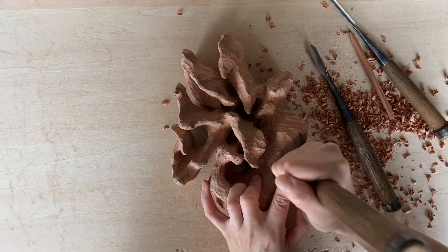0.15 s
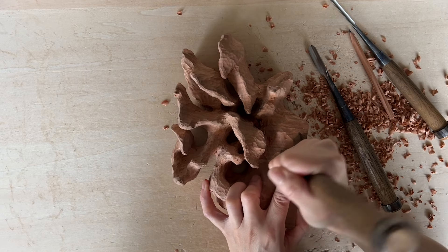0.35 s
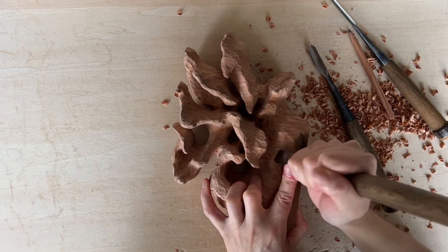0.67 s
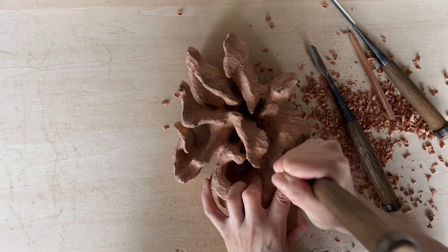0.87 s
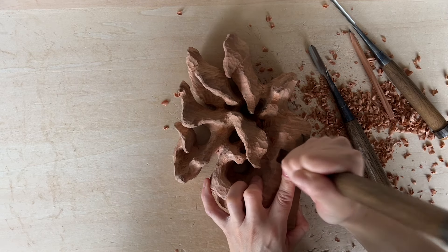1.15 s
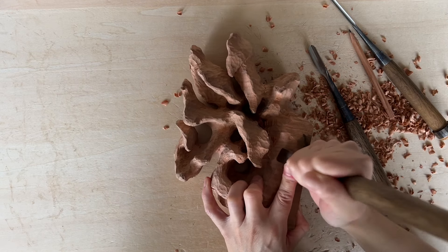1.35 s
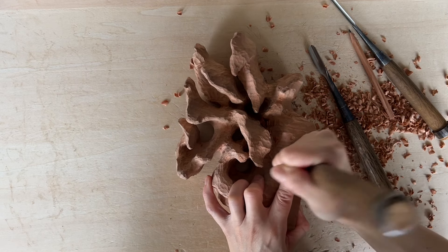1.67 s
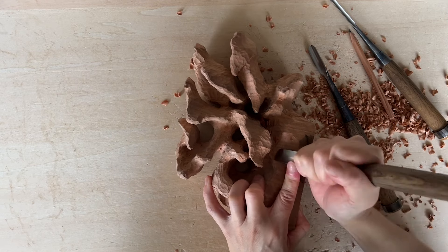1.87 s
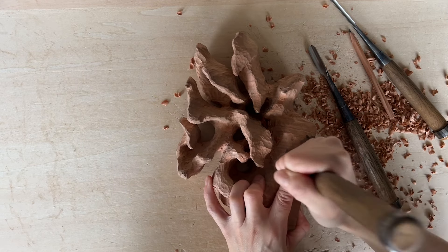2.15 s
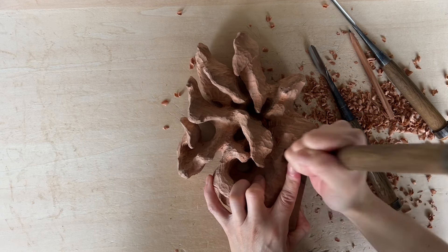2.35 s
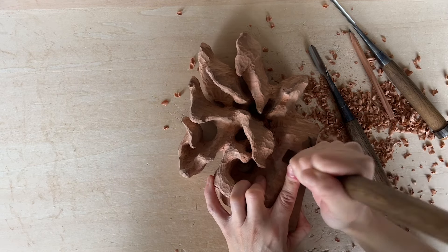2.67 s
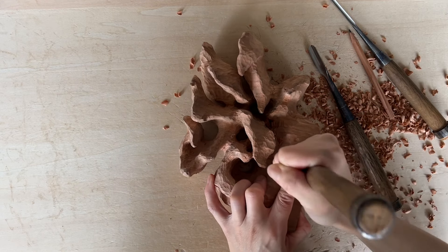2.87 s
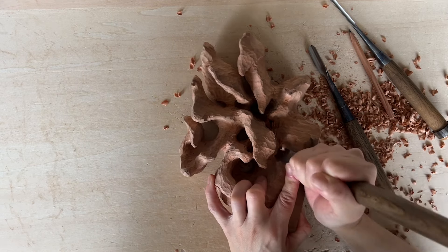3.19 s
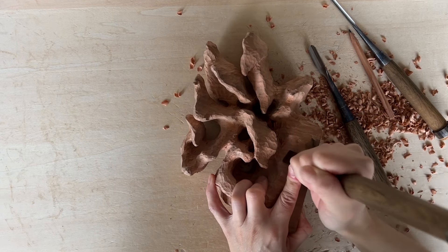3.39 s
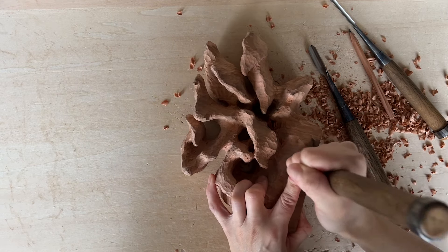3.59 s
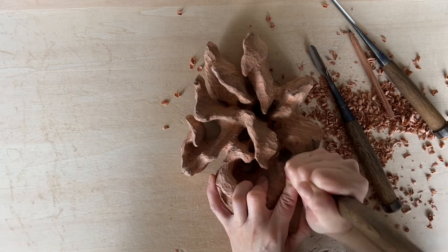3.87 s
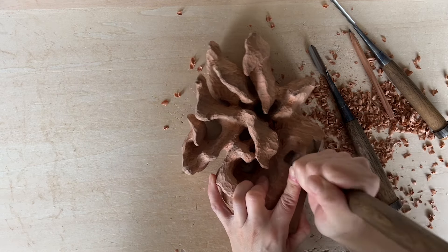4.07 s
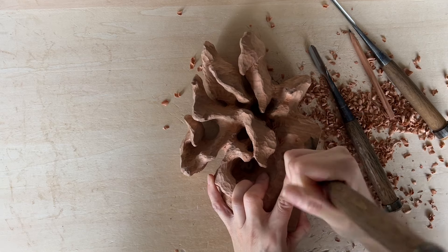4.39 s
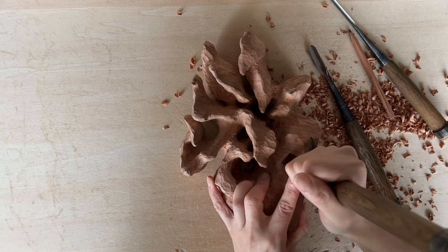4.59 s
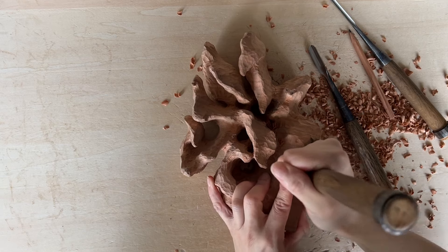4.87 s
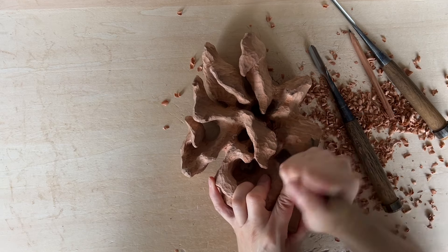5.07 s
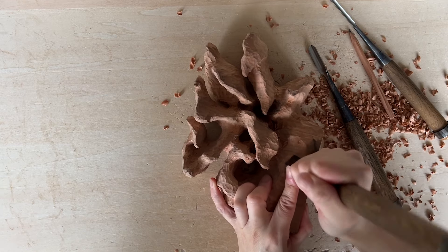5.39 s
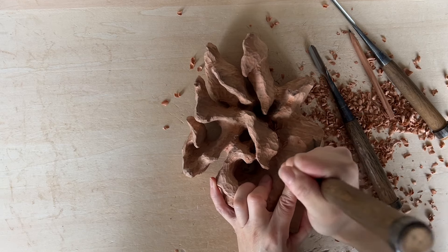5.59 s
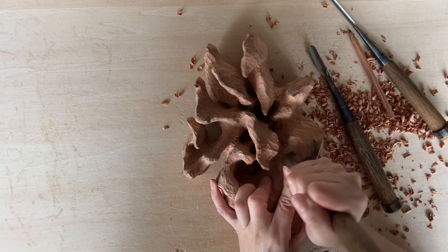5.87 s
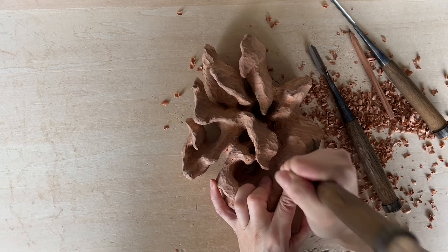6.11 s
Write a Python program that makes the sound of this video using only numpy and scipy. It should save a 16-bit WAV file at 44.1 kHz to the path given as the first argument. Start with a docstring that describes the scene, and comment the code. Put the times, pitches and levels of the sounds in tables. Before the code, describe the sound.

Close wood carving: brief dry scrapes end in sharp cracks and dull knocks, growing harder, with light chip taps between over low room air.

```python
"""A faint hum and low room air in a quiet workshop are heard first; then a hand gouge cuts a hardwood carving.
In each stroke the edge scrapes by stick-slip friction; fibres tear in quick runs and snap with sharp jolts.
The carving rocks back on the wooden bench with decaying modes, chips land, and the drawn-back gouge rubs lightly.
Bending waves are dispersive: the bench brings the treble of a jolt first, so it is heard as a short falling chirp."""
import sys
import numpy as np
from scipy import signal
from scipy.fft import rfft, irfft, next_fast_len
from scipy.io import wavfile

SR = 44100
rng = np.random.default_rng(int(sys.argv[2]) if len(sys.argv) > 2 else 0)


def transcribe(signal):
    """Save signal, clipped to [-1, 1], as a 16-bit WAV file at the path in sys.argv[1]."""
    frames = np.atleast_2d(signal).T
    limited = np.clip(frames, -1, 1)
    pcm = np.round(limited * 32767).astype(np.int16)
    wavfile.write(sys.argv[1], SR, pcm)


N = 275184
TIME = np.arange(N) / SR  # seconds

# Levels in the tables are relative: later gains, resonances and echoes act on them.
# Pushes of the gouge. Each row: time the edge is fully in (s), end (s), time to ease in (s), bite (dB),
# change of bite as the chip lifts (dB).
STROKES = [(0.353, 0.542, 0.056, -63, 5.5), (0.982, 1.213, 0.022, -62.5, 3),
           (1.628, 1.857, 0.084, -59.5, 2), (2.257, 2.474, 0.013, -59.5, 4),
           (2.911, 2.924, 0.099, -59.5, 7), (2.927, 3.117, .02, -64, 14), (3.721, 3.873, 0.034, -53.5, 4),
           (4.963, 5.106, 0.018, -58.5, 10), (5.713, 5.78, 0.19, -55, -0.5), (6.185, 6.4, 0.02, -60, 4)]
ENTRY_DB, RELEASE_S = 29.5, 0.0099  # rise of the bite over the easing time; time over which it is let go
LIFT_S, LEAN_S = 0.066, 0.036  # the chip starts to lift this long before the end; the hand leans in over this time
# Small fibres that catch along the way: rate, mean level over the bite and its standard deviation.
CATCHES_PER_S, CATCH_DB, CATCH_SPREAD_DB = 22, 14, 5.5
# Runs of fibres tearing. Each row: middle (s), level (dB), half-width (s), crackle relative to that level (dB).
TEARS = [(0.539, -31.5, 0.015, -18), (1.193, -31, 0.021, -12), (1.747, -35, 0.011, -18),
         (1.827, -37, 0.027, -32), (2.399, -37, 0.041, -10.5), (2.919, -48, 0.011, 2),
         (3.096, -27.5, 0.01, -7.5), (3.118, -31, 0.0026, 0), (3.791, -37, 0.05, -16),
         (3.825, -18.5, 0.014, -13.5), (3.858, -31.5, 0.024, -16), (5.078, -22.5, 0.015, -14),
         (5.712, -27, 0.0086, -3), (5.756, -23.5, 0.005, -10.5), (5.774, -19, 0.0025, -20)]
# Fibres snapping. Each row: time (s), peak of the jolt (dB), brightness (dB per octave).
SNAPS = [(0.471, -31, 6.5), (0.5066, -33, 0.5), (0.5283, -29, 4), (0.988, -39, 0), (1.173, -26.5, 2),
         (1.6745, -31, 2.5), (1.7236, -24.5, 1.5), (1.8, -17.5, 4), (2.261, -38, -1), (2.426, -22.5, -3),
         (2.473, -27.5, 4), (3.0692, -33.5, 2), (3.116, -6.5, -0.5), (3.8165, -16.5, 4), (3.8679, -5, 3),
         (5.032, -30, -3), (5.052, -21, 1), (5.0752, -24.5, 6), (5.0984, -5.5, 2.5), (5.7141, -20, -2.5),
         (5.7747, -13.5, 2)]
# The carving dropping back on the bench. Each row: time (s), level (dB).
ROCKS = [(0.532, -45), (1.114, -49.5), (1.804, -38), (2.478, -36), (2.922, -43), (3.12, -33.5),
         (3.872, -28), (5.103, -31), (5.721, -28.5), (5.779, -30)]
# Chips landing. Each row: time (s), peak of the jolt (dB), brightness (dB per octave),
# ring of the spot they hit relative to that peak (dB).
CHIPS = [(0.739, -39.5, -1, -26), (2.029, -44, -4.5, -32), (2.6609, -47.5, -2.5, -27),
         (2.802, -50.5, -2.5, -31), (3.199, -45.5, 8.5, -37), (4.149, -28, 1, -10.5),
         (4.592, -33.5, -2, -20.5), (5.380, -19, -0.5, -35.5), (5.943, -33, 3.5, -11)]
# The gouge drawn back after a cut. Each row: middle (s), level (dB), half-width (s).
BRUSHES = [(0.667, -73, 0.15), (1.32, -66.5, 0.064), (1.959, -66, 0.06), (2.575, -67.5, 0.075),
           (3.252, -63, 0.09), (4.059, -60, 0.037), (4.501, -75, 0.025), (5.275, -60, 0.016),
           (5.837, -64.5, 0.061)]
SET_DOWN_S, SET_DOWN_DB = 0.13, -12.5  # the gouge is set down again this much later, at this relative level

# Spectra of the sources, in order: fine scrape, coarse scrape, tearing fibres, splinters, snapping fibres,
# landing chips, rattling chips, light rubbing. Each row: frequency (Hz), relative spectral level (dB).
HISS_SPECTRUM = [(150, -25), (500, -2.5), (800, 15.5), (1100, 5.5), (1800, 5.5), (2500, 6.5), (3400, -12.5),
                 (4600, -14.5), (6000, -8.5), (7500, -7.5), (8500, -8.5), (10500, -13), (12500, -12),
                 (15500, -17.5)]
JUDDER_SPECTRUM = [(40, -26.5), (120, -2), (300, 2), (560, 0.5), (780, -3.5), (1100, -17.5), (2400, -14.5),
                   (3500, -27), (12000, -37)]
TEAR_SPECTRUM = [(40, -31.5), (120, 0.5), (300, 6), (600, 0.5), (1050, -14), (1500, -25.5), (3500, -44.5),
                 (16000, -56.5)]
CRACKLE_SPECTRUM = [(200, -24), (700, 16), (1100, -5.5), (1600, -1.5), (2500, 6.5), (3500, -14),
                    (7500, -18), (11000, -13.5), (16000, -41)]
SNAP_SPECTRUM = [(30, -29), (90, -16), (200, 7.5), (350, 3.5), (560, -2), (750, -9.5), (1050, -26),
                 (1600, -24), (2500, -37.5), (3600, -50.5), (8000, -68.5), (16000, -74.5)]
CHIP_SPECTRUM = [(50, -10), (170, 2), (350, 8.5), (540, 3), (750, -8.5), (1200, -9), (1700, -15),
                 (2400, -13), (4200, -26.5), (8000, -48), (15000, -73)]
CLATTER_SPECTRUM = [(300, -11), (900, -14), (1400, 9), (1800, 18.5), (3000, -9), (4200, -3), (5400, -28),
                    (7500, -7), (9000, -25), (15000, -41)]
BRUSH_SPECTRUM = [(200, -14.5), (800, 11), (1600, 10.5), (2000, -1.5), (2450, 15), (3200, -2.5),
                  (3900, 5.5), (5500, -5.5), (7000, 3), (8700, -13), (11000, 4), (13000, -20), (15500, -27)]

# Resonances of the gouge pressed into the carving, then of the bench top.
# Each row: centre (Hz), width (Hz), lift by this resonance alone (dB, negative for a dip).
GOUGE_RESONANCES = [(1234, 7.1, 5.5), (1388, 39, 10), (1526, 24, 5.5), (2290, 45, 7), (2423, 20, -13.5),
                    (2805, 23, 10.5), (3790, 26, 12.5), (4370, 130, 13), (4730, 70, 11.5), (4980, 100, 5.5),
                    (5460, 26, 13.5), (5390, 10, 12.5), (6590, 49, 13), (7140, 44, 7.5), (7780, 110, 6),
                    (10215, 110, 13.5), (11200, 50, 13.5)]
BENCH_RESONANCES = [(89, 8.4, 7.5), (234, 7.3, 5), (351, 36, 2.5), (565.6, 99, 2), (616, 12, -1.5),
                    (791, 14, 5), (921.4, 20, 5.5), (1050, 16, 6.5), (1196, 12, 9.5), (1561, 16, 7.5),
                    (2690, 14, 6)]
# Modes of the carving rocking on the bench, then modes rung by a landing chip.
# Each row: frequency (Hz), relative level (dB), time to fall by 60 dB (s).
ROCKING_MODES = [(62.5, -3, 0.35), (87.3, 1.5, 0.076), (112.8, -1.5, 0.16), (145, -15.5, 0.12)]
CHIP_MODES = [(1200, -11.5, 0.13), (1438, -23, 0.049), (1574, -3.5, 0.09), (1619, 5, 0.087),
              (1750, -3, 0.039), (1820, -39, 0.018), (2440, -25, 0.036), (3040, -7, 0.02),
              (4010, -12, 0.034), (6885, -19, .05)]

# Decay of the room, then of the near echoes. Each row: frequency (Hz), time to fall by 60 dB (s).
ROOM_DECAY = [(60, 1), (250, 0.31), (600, 0.45), (1600, 0.43), (4000, 0.45), (8000, 0.55), (16000, 0.093)]
NEAR_DECAY = [(100, 0.35), (1000, 0.022), (8000, 0.062)]
# Stereo difference in the echoes, then in the room air. Each row: frequency (Hz), gain (dB).
ECHO_SIDE = [(100, -20.5), (500, 0.5), (1500, 0.5), (5000, -1.0)]
AIR_SIDE = [(60, -16.5), (300, -6.0), (1500, 1), (8000, -6)]
# Phase between the microphone ports. Each row: frequency (Hz), lead of the left port (radians).
PORT_PHASE = [(0, 0), (2330, -0.0), (2580, -0.6), (3190, -0.4), (4740, -1.0), (5430, -0.2), (6460, -0.3),
              (7580, 0.4), (8180, 1.0), (9040, 3.1), (9650, 3.1), (11100, 5.6), (12700, 6.7), (13800, 9.4),
              (14900, 9.4), (15500, 10.7)]
# Lean of the close sound to the left. Each row: frequency (Hz), relative lean (scaled to dB in use).
PORT_LEAN = [(100, 2.0), (500, 5.0), (2500, 3.1), (4500, -7.0), (9000, -1.1)]
# Room air. Each row: frequency (Hz), relative spectral level (dB).
AIR_SPECTRUM = [(20, -16), (40, -5.5), (62, -3.5), (95, -12.5), (190, -11), (300, -15.5), (670, -25),
                (1100, -30), (2300, -42.5), (3000, -50.5), (10000, -61.5), (15000, -69.5)]
AIR_DB, AIR_FADE_DB_PER_S = -57.5, 0.42  # rms level at the start, and its fall
# Hum components. Each row: frequency (Hz), relative level (dB), fade (dB per s, negative for a rise).
HUM = [(59.2, -58.5, 3), (186, -67.5, -1), (227, -73.5, 0.2)]


def scraping(hiss_db=4.0, judder_db=10, grain_db=1.5, grain_hz=70):
    """Stick-slip friction: a fine hiss and a coarser judder follow the bite, both catching on the grain."""
    fine = slips(1500, 1.9, HISS_SPECTRUM, 0.003044)
    coarse = slips(350, 2.1, JUDDER_SPECTRUM, 0.0038)
    force = bite()
    out = amp(judder_db) * force * coarse
    stroke_ends = [row[1] + RELEASE_S for row in STROKES]
    stroke = np.searchsorted(stroke_ends, TIME)
    for k in np.unique(stroke):
        now = stroke == k
        hiss = signal.fftconvolve(force[now] * fine[now], spot())
        add(out, TIME[now][0], amp(hiss_db) * hiss)
    return out * amp(grain_db * drift(grain_hz))


def bite():
    """Cutting force: the edge eases in, pushes evenly, changes its bite as the chip lifts, and lets go."""
    out = np.zeros(N)
    for start, end, ease_s, db, lift_db in STROKES:
        entry_db = ENTRY_DB * np.minimum(TIME - start, 0) / ease_s
        lifting = np.clip((TIME - end + LIFT_S) / LEAN_S, 0, 1)
        release = np.clip(1 - (TIME - end) / RELEASE_S, 0, 1)
        out = np.maximum(out, release * amp(db + entry_db + lift_db * lifting))
    return out


def spot(ring_s=0.0026, ring_db=-7):
    """Local impulse response: a short random ring where the edge sits colours each stroke differently."""
    t = np.arange(SR // 30) / SR
    ring = rng.standard_normal(len(t)) * np.exp(-t / ring_s)
    response = (t == 0) + amp(ring_db) * ring / np.linalg.norm(ring)
    return response / np.linalg.norm(response)


def catching(tilt_db=3):
    """Random brittle fracture: small fibres snap while the edge is in the wood, louder under a harder bite."""
    caught = rng.random(N) < CATCHES_PER_S / SR
    clicks = caught * amp(CATCH_DB + CATCH_SPREAD_DB * rng.standard_normal(N))
    return signal.oaconvolve(clicks * bite(), chirp(SNAP_SPECTRUM, 0.00381, tilt_db))[:N]


def tearing(tear_db=-1, crackle_db=-2):
    """Progressive fracture: fibres give way in a quick run of dull slips, with splinters crackling on top."""
    dull = swells([(s, db + tear_db, length) for s, db, length, sharp_db in TEARS])
    sharp = swells([(s, db + sharp_db + crackle_db, length) for s, db, length, sharp_db in TEARS])
    fibres = dull * slips(1300, 0.93, TEAR_SPECTRUM, 0.003836)
    splinters = sharp * slips(1800, 1.3, CRACKLE_SPECTRUM, 0.003)
    return fibres + splinters


def snapping():
    """Impulsive release: breaking fibres send out jolts, and the carving drops back to ring the rocking modes."""
    out = np.zeros(N)
    for s, db, tilt_db in SNAPS:
        add(out, s, amp(db) * chirp(SNAP_SPECTRUM, 0.0039, tilt_db))
    for s, db in ROCKS:
        add(out, s, amp(db) * ringing(ROCKING_MODES))
    return out


def landing(lag=0.003824, bounce_s=0.0069, bounce_db=-9, clatter_db=-14, clatter_s=0.0035):
    """Impact and reflection: a chip excites a chirp and modes; the far bench edge returns a duller chirp."""
    out, rocking = np.zeros((2, N))
    t = np.arange(SR // 10) / SR
    for s, db, tilt_db, ring_db in CHIPS:
        add(out, s, amp(db) * chirp(CHIP_SPECTRUM, lag, tilt_db))
        add(out, s + bounce_s, amp(db + bounce_db) * chirp(CHIP_SPECTRUM, lag, tilt_db - 2))
        add(out, s, amp(db + ring_db) * ringing(CHIP_MODES))
        # the curled chip rattles to rest, more strongly after a brighter impact
        add(rocking, s, amp(db + clatter_db + 2 * tilt_db) * np.exp(-t / clatter_s))
    return out + rocking * slips(2400, 0.72, CLATTER_SPECTRUM, 0.00197)


def brushing(brush_db=2):
    """Light sliding friction: the gouge rubs as it is drawn back and set down again."""
    set_down = [(s + SET_DOWN_S, db + SET_DOWN_DB, length) for s, db, length in BRUSHES]
    motion = swells(BRUSHES) + swells(set_down)
    return amp(brush_db) * motion * slips(1100, 1.84, BRUSH_SPECTRUM, 0.0011)


def slips(per_s, spread_db, spectrum, lag):
    """Stick-slip as shot noise: a steady random stream of tiny jolts of uneven size and sign, rms 1."""
    size = amp(spread_db * np.minimum(rng.exponential(1, N), 3)) * rng.choice([-1, 1], N)
    clicks = size * (rng.random(N) < per_s / SR)
    return unit(signal.oaconvolve(clicks, chirp(spectrum, lag))[:N])


def chirp(spectrum, lag, tilt_db=0, size=4096):
    """Bending-wave dispersion: delay goes nearly as lag (s at about 1 kHz) / sqrt(frequency in kHz); peak 1."""
    hz = np.fft.rfftfreq(size, 1 / SR)
    delay = lag * np.sqrt(1000 / (hz + 20))
    # phase is the running sum of delay, counted from that of the highest frequency
    phase = 2 * np.pi * np.cumsum(delay - delay[-1]) * SR / size
    brightness_db = tilt_db * np.log2(np.clip(hz, 200, 6000))
    gain = amp(read(spectrum, hz) + brightness_db) * (hz > 0)
    wave = irfft(gain * np.exp(-1j * phase))[:size // 2]
    return wave / abs(wave).max()


def ringing(modes):
    """Modal superposition: a sum of exponentially dying sines."""
    t = np.arange(SR // 2) / SR
    return sum(amp(db - 60 * t / t60) * np.sin(2 * np.pi * hz * t) for hz, db, t60 in modes)


def resonate(x, modes):
    """Resonant response: a body lifts or dips the sound around each of its resonances."""
    size = next_fast_len(N + SR, True)
    hz = np.fft.rfftfreq(size, 1 / SR)
    lift = 1 + sum((amp(db) - 1) / (1 + 2j * (hz - centre) / width) for centre, width, db in modes)
    return irfft(rfft(x, size) * lift, size)[:N]


def ports(x, lean_scale=0.2247):
    """Interchannel phase: the close sound reaches two ports with a gap that is largest in the high treble."""
    hz = np.fft.rfftfreq(N, 1 / SR)
    lean_db = lean_scale * read(PORT_LEAN, hz)
    gap = np.exp(-1j * read(PORT_PHASE, hz))
    return irfft(rfft(x) * np.array([amp(lean_db), amp(-lean_db) * gap]), N)


def reflections(x, t60s, start):
    """Diffuse decay: sparse random-sign echoes after start (s) die at a speed set by frequency."""
    t = np.arange(SR) / SR
    taps = rng.choice([-1., 1.], (2, SR)) * (rng.random((2, SR)) < 1 / 10) * (t > start)
    hz, t, (mid, side) = signal.stft(taps, SR, nperseg=256)
    side = side * amp(read(ECHO_SIDE, hz))[:, None]  # the bass is nearly alike in both channels
    decay = amp(-60 * t / read(t60s, hz)[:, None])
    tail = signal.istft(np.array([mid + side, mid - side]) * decay, SR, nperseg=256)[1]
    return signal.fftconvolve(x[None], tail / np.linalg.norm(tail[0]), axes=1)[:, :N]


def workshop(hum_db=-1, waver=0.36):
    """Stationary background: filtered noise for slowly fading room air, and wavering sines for the hum."""
    hz = np.fft.rfftfreq(N, 1 / SR)
    mid, side = rfft(rng.standard_normal((2, N))) * amp(read(AIR_SPECTRUM, hz))
    side = side * amp(read(AIR_SIDE, hz))
    noise = unit(irfft(np.array([mid + side, mid - side]), N))
    out = amp(AIR_DB - AIR_FADE_DB_PER_S * TIME) * noise
    for line_hz, db, fade in HUM:
        tone = np.sin(2 * np.pi * (line_hz * TIME + rng.random()))
        out = out + amp(db + hum_db - fade * TIME) * unit((1 + waver * drift(20)) * tone)
    return out


def swells(rows):
    """Gaussian envelopes: one smooth hump for each (s, dB, half-width in s) row."""
    out = np.zeros(N)
    for s, db, length in rows:
        near = abs(TIME - s) < 3 * length
        out[near] += amp(db) * np.exp(-2 * ((TIME[near] - s) / length) ** 2)
    return out


def drift(top_hz):
    """Band-limited noise: a random wander below top_hz, rms 1."""
    spectrum = rfft(rng.standard_normal(N))
    return unit(irfft(spectrum * (np.fft.rfftfreq(N, 1 / SR) < top_hz), N))


def add(mix, s, sound):
    """Superposition: adds a sound into the mix at time s."""
    part = mix[max(round(s * SR), 0):][:len(sound)]
    part += sound[:len(part)]


def read(points, hz):
    """Interpolation: joins (Hz, value) points by straight lines on a log frequency axis."""
    f, value = np.transpose(points)
    return np.interp(np.log(hz + 1), np.log(f + 1), value)


def unit(x):
    """Normalisation: scales to rms 1."""
    return x / np.sqrt(np.mean(x ** 2) + 1e-20)


def amp(db):
    """Logarithmic level: decibels to amplitude gain."""
    return 10 ** (np.asarray(db) / 20)


def scene(near_db=-13, room_db=-12, chip_room_db=-7):
    """Linear superposition: cuts and chips sound through the bench, its near echoes and the room."""
    edge = resonate(scraping() + tearing(), GOUGE_RESONANCES)
    cuts = resonate(edge + brushing() + catching() + snapping(), BENCH_RESONANCES)
    chips = resonate(landing(), BENCH_RESONANCES)
    near = reflections(cuts + chips, NEAR_DECAY, 0.0042)
    far = reflections(amp(room_db) * cuts + amp(chip_room_db) * chips, ROOM_DECAY, 0.0037)
    return ports(cuts + chips) + amp(near_db) * near + far + workshop()


def record(dry, low_hz=48, edge_hz=15850):
    """Band limitation: the recorder rolls off the bass and cuts the extreme treble."""
    bass_cut = signal.butter(5, low_hz, "highpass", fs=SR, output="sos")
    lean = signal.sosfilt(bass_cut, dry)
    treble_cut = signal.firwin(511, edge_hz, window=("kaiser", 9), fs=SR)
    return signal.oaconvolve(lean, treble_cut[None], "same")


dry = scene()
out = record(dry)
transcribe(out)
```